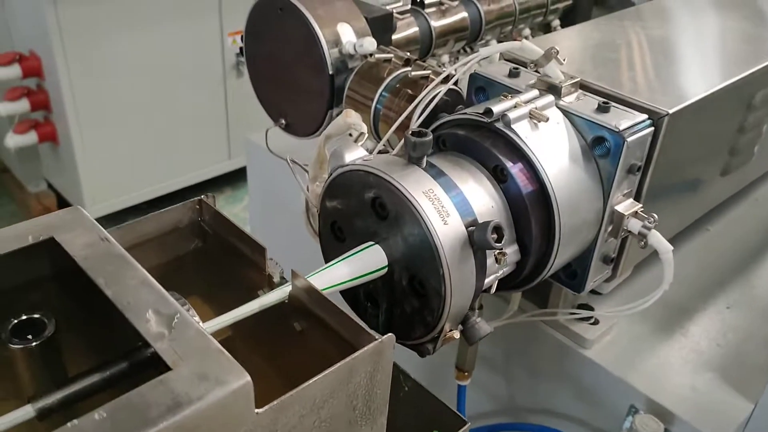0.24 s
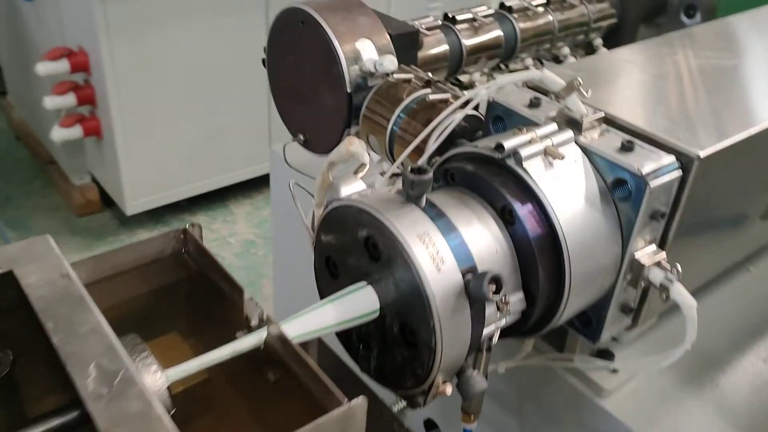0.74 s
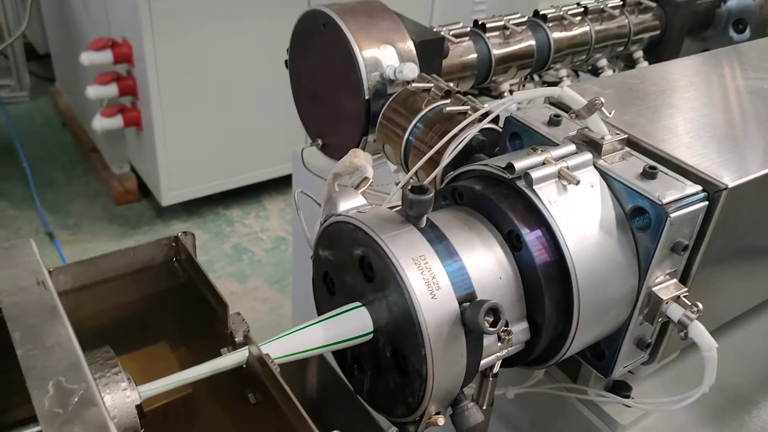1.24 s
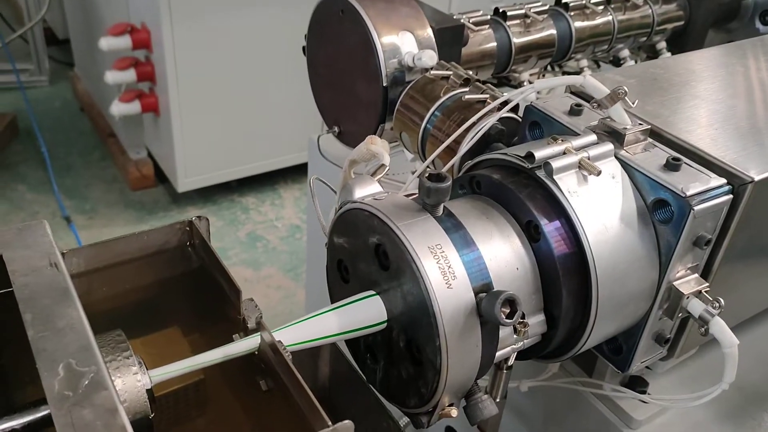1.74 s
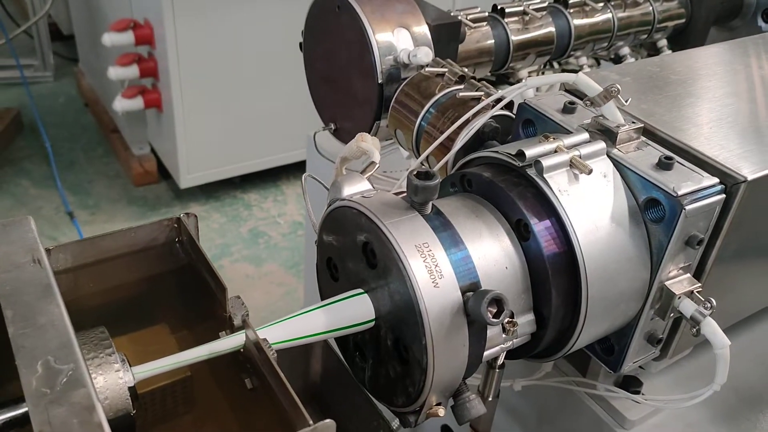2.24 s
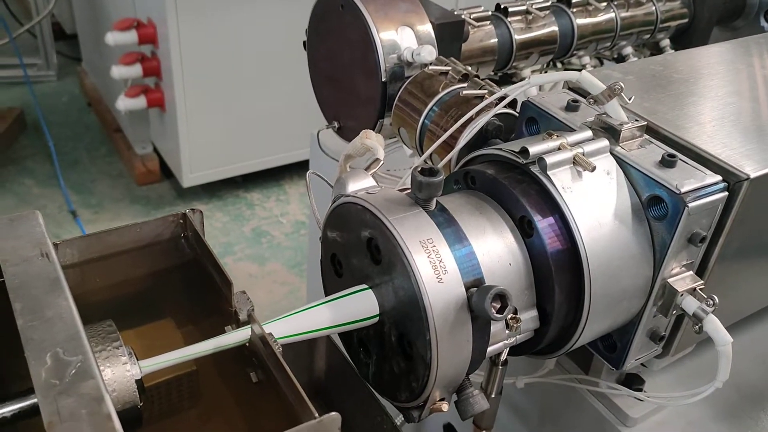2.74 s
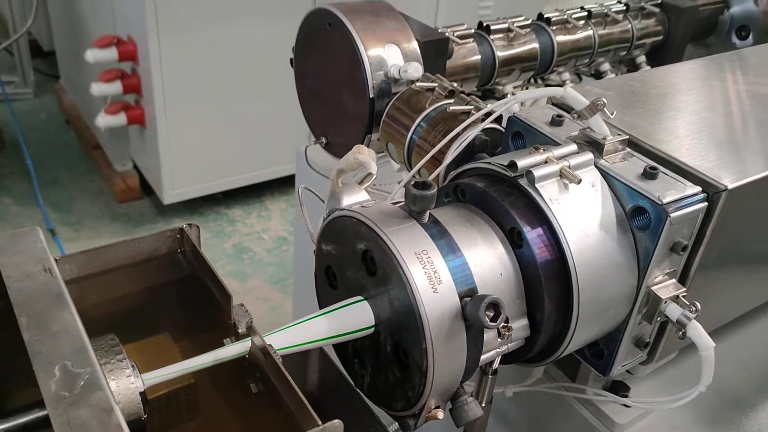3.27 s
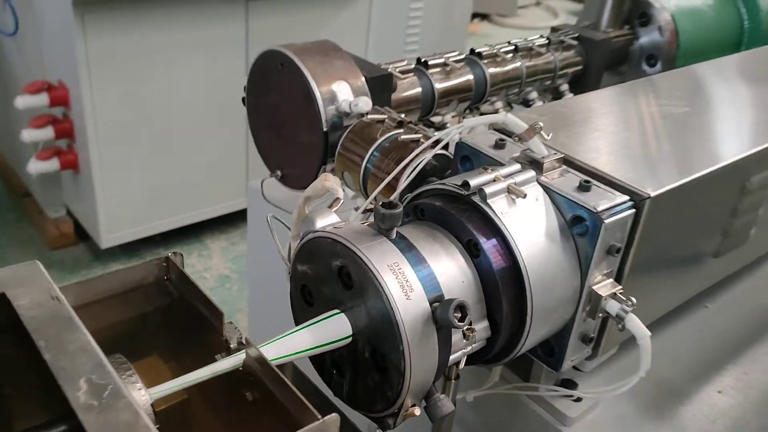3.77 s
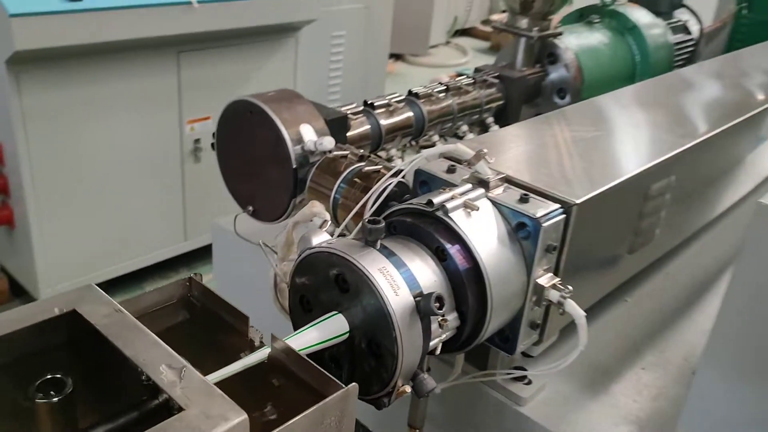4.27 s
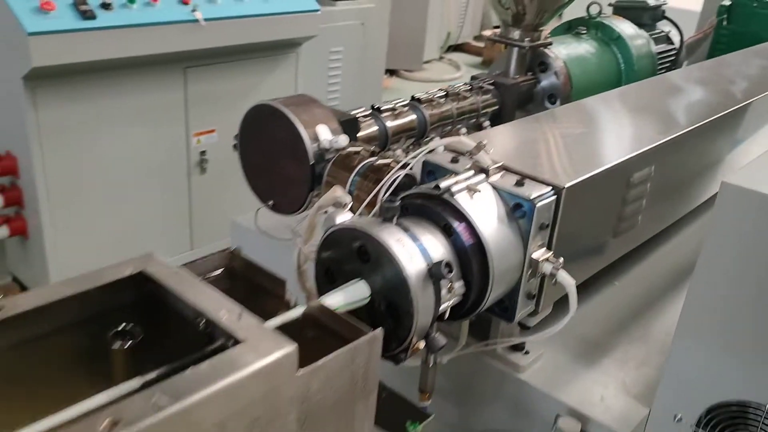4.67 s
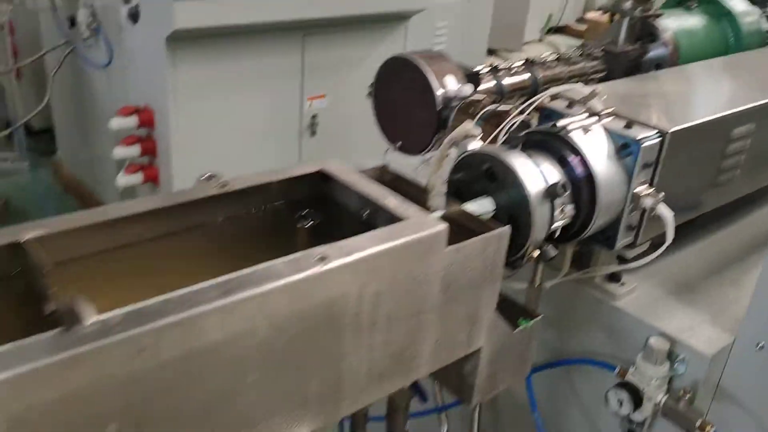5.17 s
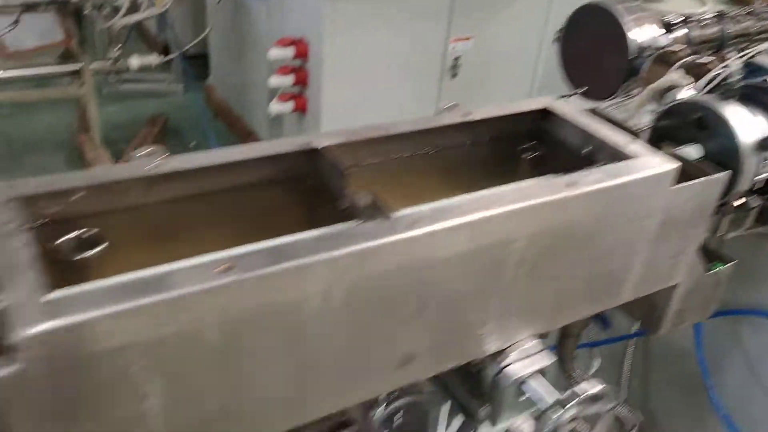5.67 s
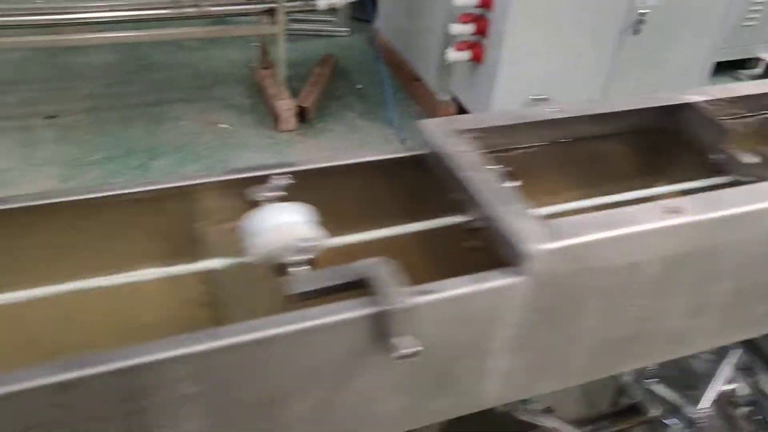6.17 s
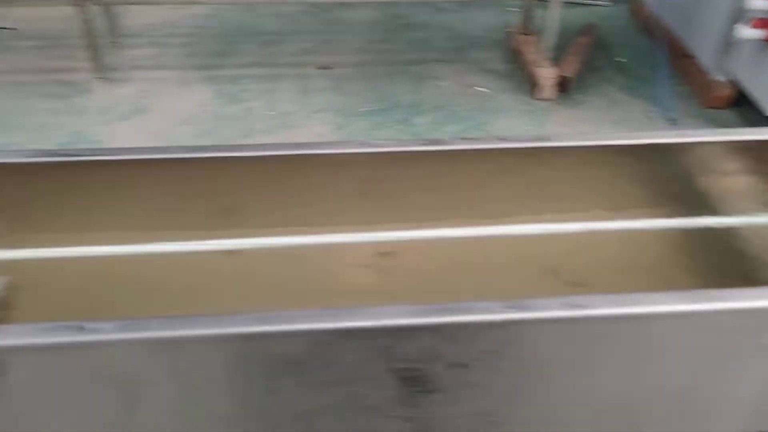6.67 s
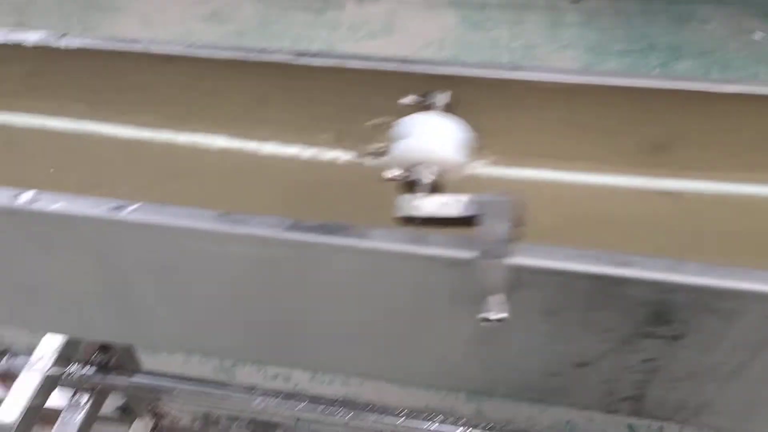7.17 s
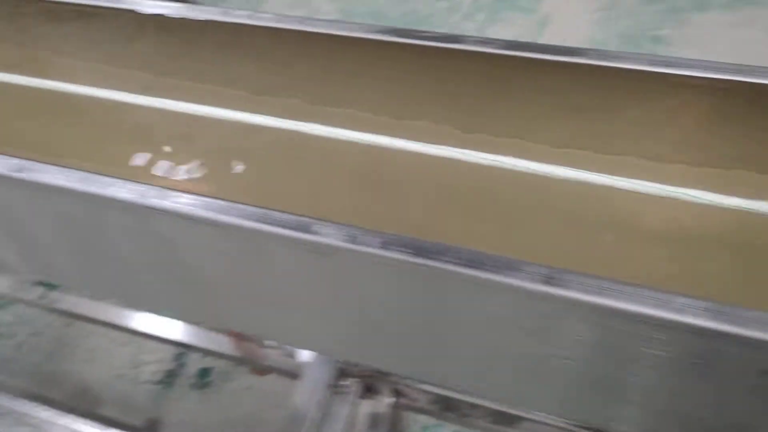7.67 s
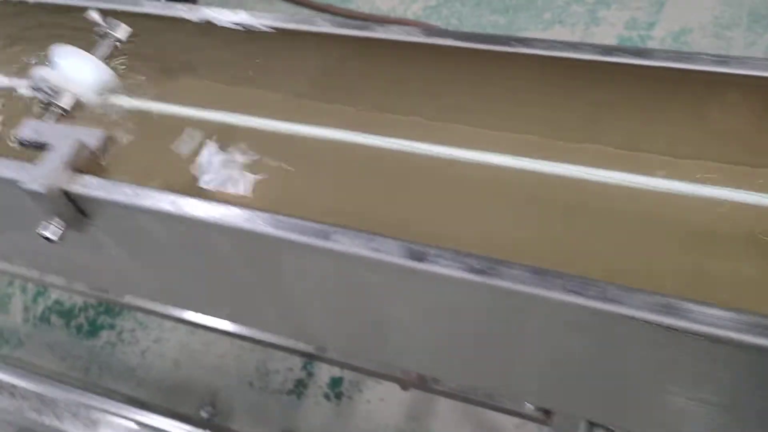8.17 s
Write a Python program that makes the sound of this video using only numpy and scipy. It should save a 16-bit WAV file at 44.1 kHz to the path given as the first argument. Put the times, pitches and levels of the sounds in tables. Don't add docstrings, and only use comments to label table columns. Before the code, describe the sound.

Close to an extruder die, a piercing steady air hiss leans left, with thin ringing pump spray and low machine drone underneath. Quick regular ticks and dull thuds of a cutter blur into the hall. After nearly six seconds the phone swings down the bath; hiss weakens and dulls, watery pipe noise swells, low handling thumps intrude, and the chopping becomes nearer and rounder.

```python
import sys
import numpy as np
from scipy import signal
from scipy.fft import rfft, irfft, next_fast_len
from scipy.io import wavfile
from scipy.ndimage import uniform_filter1d

SR = 44100
rng = np.random.default_rng(int(sys.argv[2]) if len(sys.argv) > 2 else 0)


def amplitude_ratio(level_db):
    exponent = np.asarray(level_db, float) / 20
    return 10 ** exponent


def dump(signal):
    limited = np.clip(np.atleast_2d(signal).T, -1, 1)
    pcm = np.round(limited * 32767).astype(np.int16)
    wavfile.write(sys.argv[1], SR, pcm)


N = 371322
T = np.arange(N) / SR
SIZE = next_fast_len(N)
HZ = np.arange(SIZE // 2 + 1) * SR / SIZE + 1e-3
LAG = np.exp(2j * np.pi * HZ * 0.0003086)
# (s: moving in, there, leaving, back)
STOOP_S = (.5, 1.0, 3.6, 3.8)

# time in seconds, level in dB, left minus right in dB,
# aim of the left port at the jet from 0 to 1.
JET_PATH = [(0, -29.5, 9, 0.47), (.7, -29.5, 7.5, .7), (1.0, -28.5, 8.5, 0.84), (2.0, -28.5, 7.5, 0.82),
            (3.3, -28.5, 7.5, 0.86), (4.1, -28.5, 8, 0.82), (4.75, -30, 9.5, 0.63), (5.2, -28.5, 9, 0.9),
            (5.72, -29, 7.5, 0.8), (5.9, -33.5, 6.5, 0.2), (6.4, -34, 6.5, 0), (6.7, -32.5, 5.5, .45),
            (6.9, -35.5, 1, 0.26), (7.3, -35.5, -0.5, 0.07), (7.7, -35, 3, 0.3), (8.0, -36, 4.5, .1),
            (8.42, -34.5, 3.5, 0.3)]
# time in seconds, nearness to the cutter from 0 to 1.
WALK_PATH = [
    (0, 0.01),
    (3.6, 0.09),
    (4.1, 0.06),
    (5.5, 0.27),
    (6.5, 0.26),
    (7.1, .6),
    (7.5, 0.78),
    (8.42, 0.88),
]


def curves(table):
    s, *columns = np.transpose(table)
    return [np.interp(T, s, column) for column in columns]


def spell(times_s):
    return np.interp(T, times_s, [0, 1, 1, 0])


def along(points):
    hz, value = np.transpose(points)
    return np.interp(np.log(HZ), np.log(hz), value)


def above(hz, octaves):
    return .5 + .5 * np.tanh(np.log2(HZ / hz) / octaves)


def unit(x):
    return x / np.sqrt(np.mean(x ** 2, axis=-1, keepdims=True))


def ports(pan_db):
    g = amplitude_ratio(pan_db / 2)
    return 2 * np.array([g, 1 / g]) / np.sqrt(g ** 2 + g ** -2)


def walk(rate):
    k = int(SR / rate)
    held = np.repeat(rng.standard_normal(N // k + 1), k)
    return unit(uniform_filter1d(uniform_filter1d(held, k), k)[:N])


def pair(spectrum):
    # frequency in Hz, correlation from 0 to 1.
    likeness = [(60, 0.7), (300, 1), (600, 1), (1200, 0.05), (2500, 0.66), (3400, 0.4), (5000, 0.07),
                (16000, 0)]
    left, other = spectrum
    like = np.clip(along(likeness), 0, 1)
    return np.array([left, like * left * LAG + np.sqrt(1 - like ** 2) * other])


def noise():
    return pair(rfft(rng.standard_normal((2, SIZE))))


def sound(spectrum):
    return irfft(spectrum, SIZE)[..., :N]


def unsteady(spectrum, db, wobble_db, rate):
    return unit(sound(spectrum)) * amplitude_ratio(db + wobble_db * walk(rate))


def ring(modes, rise_s):
    t = T[:SR // 2]
    tone = sum(amplitude_ratio(db) * np.sin(2 * np.pi * hz * t) * amplitude_ratio(-60 * t / t60) for hz, db, t60 in modes)
    return rfft(tone * (1 - np.exp(-t / rise_s)), SIZE)


def jet():
    # frequency in Hz, density in dB per Hz.
    left_colour = [(3500, -34.5), (4500, -8), (5500, -8.5), (6300, -7), (7000, -5.5), (7400, -2.5),
                   (8000, -6.5), (8700, -12), (10000, -12.5), (11500, -6), (13000, -4), (14300, 0.5),
                   (15600, -2.5), (17000, -27)]
    # frequency in Hz, density in dB per Hz.
    right_colour = [(3500, -41), (4500, -30), (5500, -18.5), (6500, -13.5), (6800, -14), (7300, -4.5),
                    (8100, -2), (8600, -7), (9000, -13), (10500, -8), (12000, -11.5), (13000, -11),
                    (14500, -12.5), (17000, -40)]
    db, pan_db, aim = curves(JET_PATH)
    top_db, top_pan_db = -46 + 9.5 * aim, -0.5 + 18.5 * aim
    leak_db = 4 * spell((5.8, 5.92, 6.82, 6.92))
    edge_db = db - 6 - 4.5 * aim + leak_db
    air = noise() * amplitude_ratio(np.array([along(left_colour), along(right_colour)]))
    top, body = above(10000, 0.14), above(5945, 0.11)
    parts = [(1 - body, edge_db, 1.3 * pan_db), (body - top, db, pan_db), (top, top_db + 2.0, top_pan_db)]
    return sum(unsteady(air * share, d, .5, 9) * ports(p) for share, d, p in parts)


def pump():
    # time in seconds, level in dB, left minus right in dB.
    path = [(0, -42, 3), (1.3, -39, 1), (2.6, -39.5, 2), (3.0, -38, 3), (3.8, -40, 2.5), (4.22, -42, 4),
            (5.0, -41.5, 3), (5.3, -39, 2), (5.7, -38, 2.5), (5.8, -35, 3.5), (6.45, -32.5, 11),
            (6.68, -29, 11.5), (6.85, -34, 12), (7.15, -38.5, 8.5), (7.5, -36, 10), (7.92, -34, 11),
            (8.05, -35.5, 11.5), (8.42, -32.5, 13)]
    # frequency in Hz, width in Hz, height over the spray in dB.
    pipe_modes = [(2210, 67, 6), (2453, 40, 10), (2721, 37, 9.5), (2941, 120, 6.5), (3394, 50, 9),
                  (3650, 16, 3.5)]
    # frequency in Hz, density in dB per Hz.
    colour = [(1300, -27), (1700, -10.5), (2100, -6), (2600, -1.5), (3200, -4.5), (3800, -1.5),
              (4300, -2.5), (5000, -23)]
    db, pan_db = curves(path)
    aim = curves(JET_PATH)[2]
    near, = curves(WALK_PATH)
    swing_db = db - np.mean(db)
    back_db = 2.5 * spell((3.55, 3.75, 5.3, 5.75))
    upper_db = -42.5 + 0.01 * swing_db + 2.5 * aim - 3 * near + back_db
    upper_pan_db = 3.5 - 2 * spell(STOOP_S)
    splash_db = -51 + 0.46 * swing_db + 7.5 * near
    resonance = 1 + sum((amplitude_ratio(d) - 1) / (1 + (2 * (HZ - hz) / width) ** 2) for hz, width, d in pipe_modes)
    spray = noise() * amplitude_ratio(along(colour)) * resonance
    pipe, upper = above(2050, 0.066), above(3100, 0.12)
    parts = [(1 - pipe, splash_db, 0.8 * pan_db), (pipe - upper, db, pan_db),
             (upper, upper_db + 2.5, upper_pan_db)]
    return sum(unsteady(spray * share, d, 0.58, 12) * ports(p) for share, d, p in parts)


def hum():
    # frequency in Hz, density in dB per Hz.
    colour = [(12, -50), (20, -7.5), (53, -12), (100, -5.5), (149, -8.5), (188, -2.5), (238, -0.5),
              (290, 1.5), (375, -1.5), (422, 2.5), (523, -1.5), (761, -1), (1080, -11), (1610, -15),
              (2200, -33.5), (2860, -70), (4840, -120)]
    # frequency in Hz, rms level in dB, wobble in dB.
    drives = [(24.3, -53, 2), (95.6, -54, 0.5), (99, -71, 5), (108.9, -52, 4.5), (113.9, -56, 1),
              (184.8, -58.5, -3), (410, -57.5, 5), (433, -53.5, 3)]
    near, = curves(WALK_PATH)
    hum_db, pan_db = -40.5 - 3 * near, 4 + 3 * near
    whine_db = -48.5 + 2 * near
    bass_db = -49.5 + spell(STOOP_S) - 2.5 * np.sqrt(np.clip(near, 0, 1))
    roar = noise() * amplitude_ratio(along(colour))
    low, upper = above(210, 0.045), above(890, 0.096)
    parts = [(1 - low, bass_db - 1.5), (low - upper, hum_db - 1.5), (upper, whine_db - 0.5)]
    blur = sum(unsteady(roar * share, d, 0.59, 3.6) for share, d in parts)
    tones = np.zeros(N)
    for hz, db, wobble_db in drives:
        phase = rng.uniform(0, 2 * np.pi)
        level = amplitude_ratio(db + wobble_db * walk(1.68)) * np.sqrt(2)
        tones += level * np.sin(2 * np.pi * hz * T + phase)
    return (blur + 0.57 * tones * amplitude_ratio(bass_db - np.mean(bass_db))) * ports(pan_db)


def cutter():
    # frequency in Hz, level in dB, T60 in seconds.
    blade_far = [(760, -6, .05), (920, -2, .035), (1030, 0, .03), (1170, 1, .03), (1300, 0, .025),
                 (1420, -2, .02), (1600, -9, .015)]
    # frequency in Hz, level in dB, T60 in seconds.
    blade_near = [(793, -1, 0.049), (878, 5, 0.054), (1112, -5, 0.042), (1440, -17, 0.033),
                  (2640, -9, 0.023)]
    # frequency in Hz, level in dB, T60 in seconds.
    frame_far = [(88.2, -5, 0.26), (181.2, -2, 0.15), (259, -9, .3), (294.2, 11, 0.1), (340.3, -3, 0.52),
                 (381, 2.5, 0.47), (410.5, -12.5, 0.2), (495.3, -1, 0.23), (561, -0.5, 0.12),
                 (600.5, -7, 0.22), (729, 6, 0.082), (823, -1.5, 0.18)]
    # frequency in Hz, level in dB, T60 in seconds.
    frame_near = [(107, -37, .3), (179, 5, 0.17), (211, 6.5, 0.39), (304.2, 15, 0.11), (329, 5, 0.14),
                  (410, -5, 0.11), (555, -13, 0.33), (690, -14, 0.06), (860, -18, 0.06)]
    # time after the chop in seconds, level in dB.
    frame_blows = [
        (0, -2.5),
        (.012, 4),
        (.045, -5),
        (.09, -13),
    ]
    first_s, period_s = .1045, .19057
    hall_t60_s, hall_db = 0.82, -1.5
    near, stoop = np.clip(curves(WALK_PATH)[0], 0, 1), spell(STOOP_S)
    far_gain = np.sqrt(1 - near)
    tick_db = -33 + 5.5 * stoop + 1.5 * near
    thud_db = -30 - 2 * stoop - 0.5 * near

    at = (np.arange(first_s - 5 * period_s, N / SR, period_s) * SR).astype(int)
    chance = rng.standard_normal((len(at), 1 + len(frame_blows)))
    chops, blows = np.zeros(SIZE), np.zeros(SIZE)
    chops[at % SIZE] = amplitude_ratio(.7 * chance[:, 0])
    for k, (late_s, db) in enumerate(frame_blows):
        blows[(at + int(late_s * SR)) % SIZE] += amplitude_ratio(db + 1.2 * chance[:, k + 1])

    tail = T[:SR]
    echo = rng.standard_normal((2, SR)) * amplitude_ratio(-60 * tail / hall_t60_s) * (1 - np.exp(-tail / 0.011))
    echo = echo / np.sqrt(np.sum(echo ** 2, axis=1, keepdims=True))
    hall = pair(rfft(echo, SIZE)) * amplitude_ratio(hall_db)
    direct = np.array([np.ones_like(HZ), amplitude_ratio(-1.5) * LAG])
    chops = rfft(chops) * (direct + 0.36 * hall)
    blows = rfft(blows) * (direct + hall)

    tick = far_gain * sound(chops * ring(blade_far, 0.00037))
    tick = tick + near * 1.6 * sound(chops * ring(blade_near, 0.0017))
    thud = far_gain * sound(blows * ring(frame_far, 0.007))
    thud = thud + np.sqrt(near) * 1.27 * sound(blows * ring(frame_near, 0.0059))
    return (.8 * tick * amplitude_ratio(tick_db) + 0.12 * thud * amplitude_ratio(thud_db)) * ports(4.3)[:, None]


def knocks():
    # start in seconds, peak level in dB, frequency in Hz.
    touches = [
        (5.822, -32, 55),
        (6.0, -40, 30),
        (6.781, -24, 70),
    ]
    out = np.zeros(N)
    for s, db, hz in touches:
        t = np.clip(T - s, 0, None)
        out += amplitude_ratio(db) * 2 * np.sin(2 * np.pi * hz * t) * np.exp(-2.5 * hz * t)
    return out * np.array([[1], [amplitude_ratio(-25.0)]])


def scene():
    return jet() + pump() + hum() + cutter() + knocks()


def low_pass(x):
    return signal.sosfilt(signal.butter(12, 16200, fs=SR, output="sos"), x)


def record(dry):
    # frequency in Hz, width in Hz, depth in dB.
    casing = [(4000, 140, -10), (4400, 280, -13), (4680, 300, -16), (5330, 220, -10), (6050, 180, -6),
              (9300, 250, -4), (11200, 300, -4), (12800, 200, -6)]
    notch_db = sum(db / (1 + (2 * (HZ - hz) / width) ** 2) for hz, width, db in casing)
    mix = sound(rfft(dry, SIZE) * amplitude_ratio(notch_db))
    return low_pass(mix)


dry = scene()
out = record(dry)
dump(out)
```